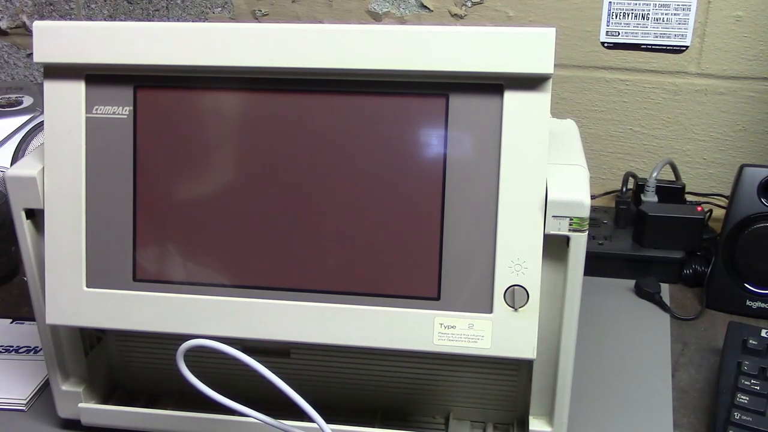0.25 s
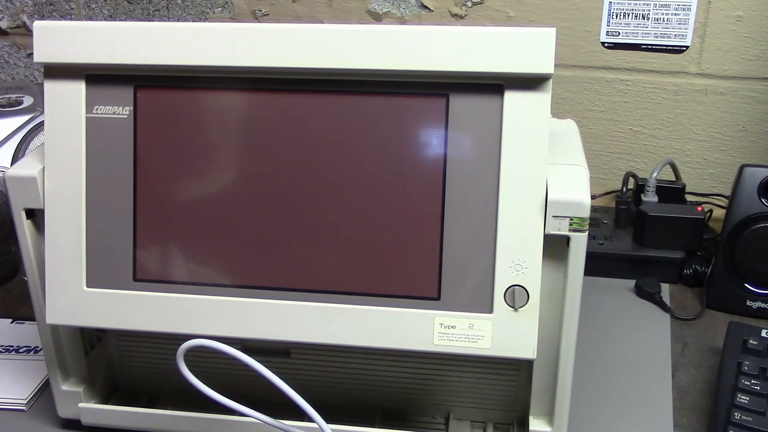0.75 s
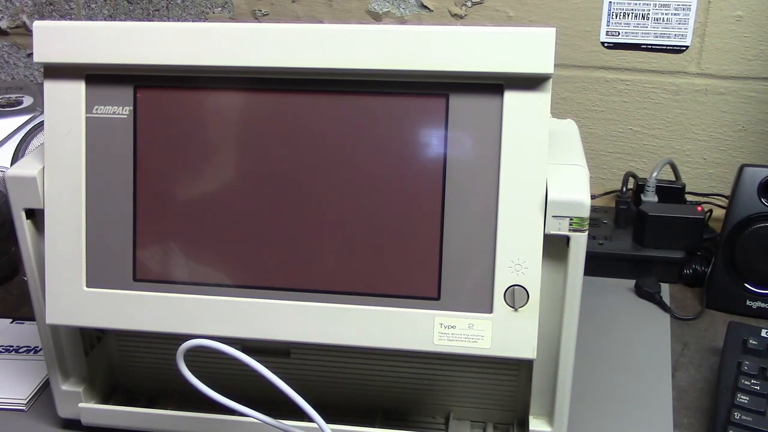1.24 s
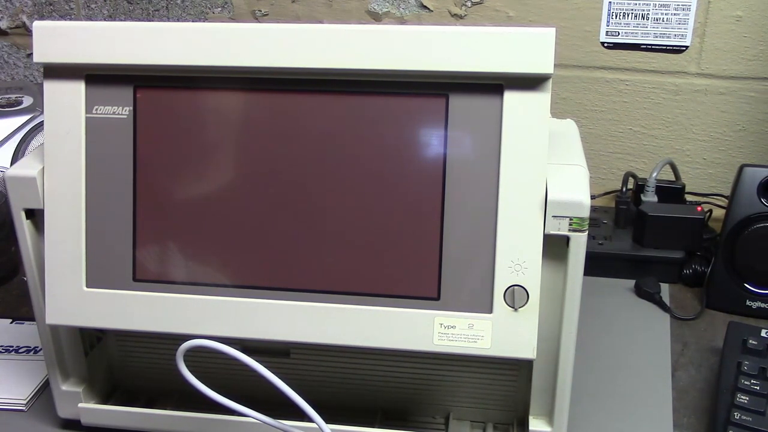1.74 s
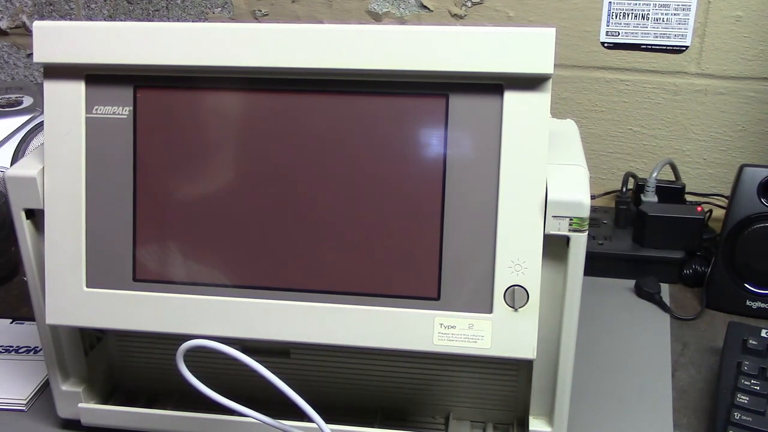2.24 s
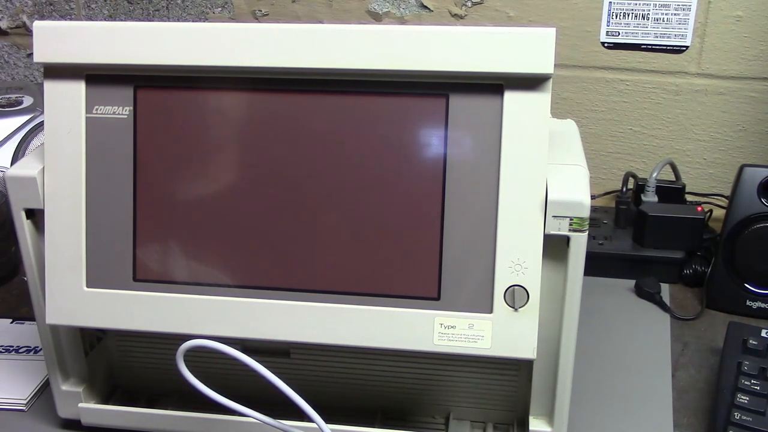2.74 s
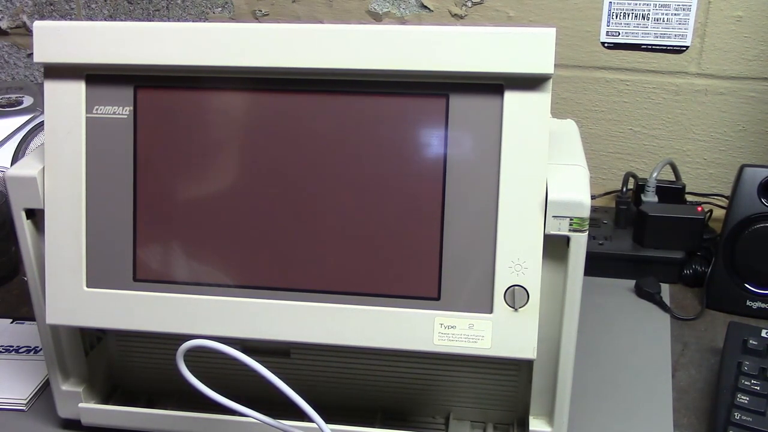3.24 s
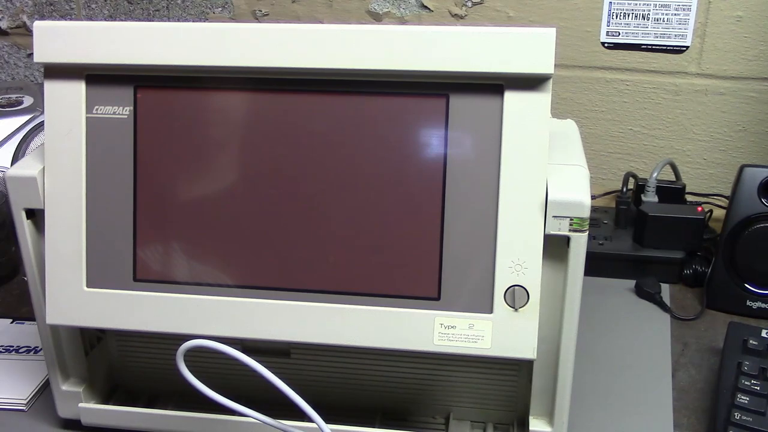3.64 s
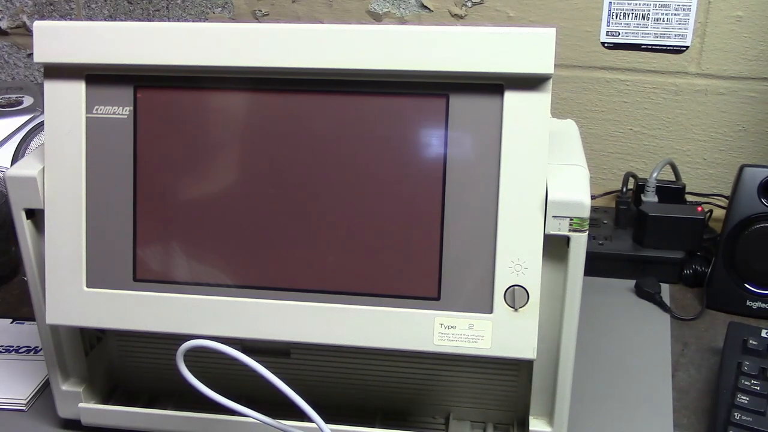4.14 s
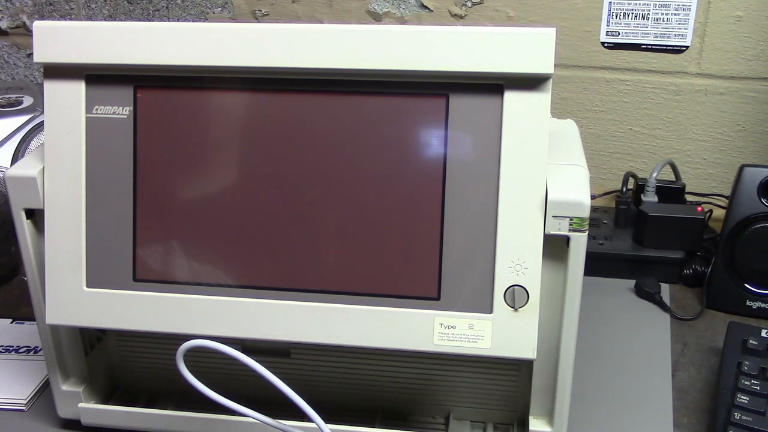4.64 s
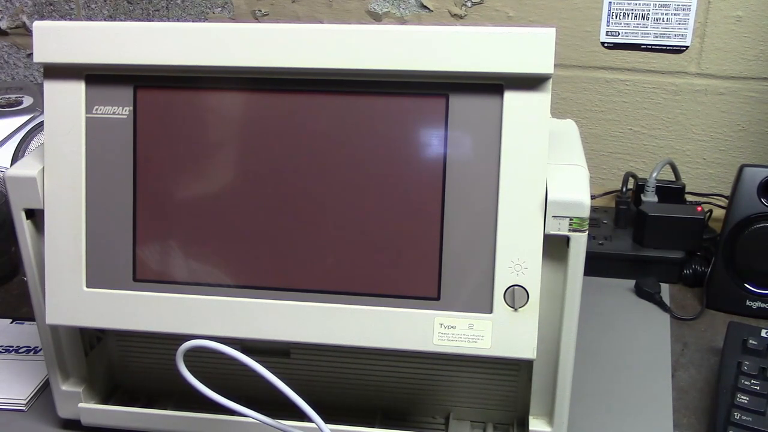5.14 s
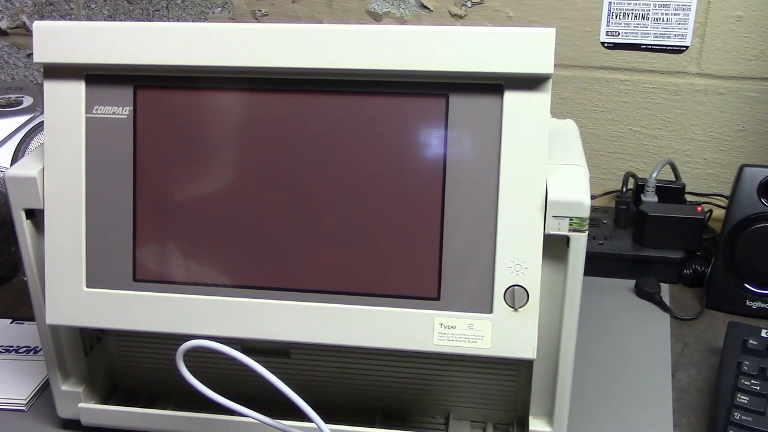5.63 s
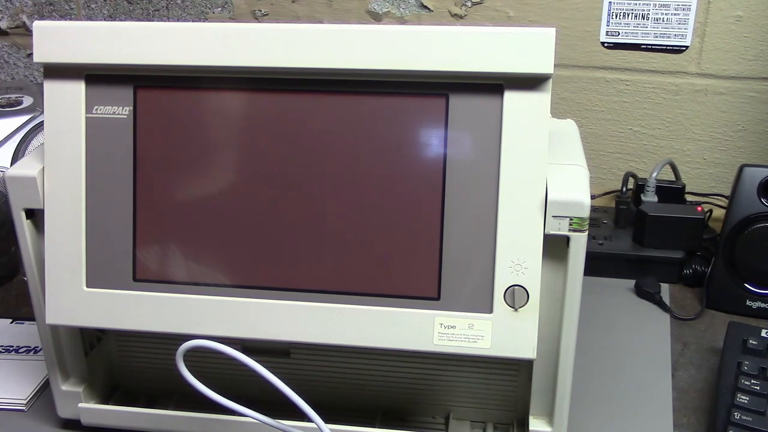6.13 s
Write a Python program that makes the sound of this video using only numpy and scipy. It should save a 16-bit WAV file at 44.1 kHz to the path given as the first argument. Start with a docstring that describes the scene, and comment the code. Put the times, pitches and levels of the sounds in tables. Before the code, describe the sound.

Close, nearly mono pickup of an old computer idling in a small hard-walled room. A deep mains hum and steady fan drone with soft airy noise run throughout. Sparse, muted head-motor buzzes come first, then stronger rattly ones just after three seconds, around five and near the end, with tiny gritty ticks. A very faint narrow pip returns every two seconds.

```python
"""Old portable computer idling

An old portable computer idles on a desk in a small block-walled room. Two fans and a disk spindle,
built from sines on multiples of their turning rates, run over mains hum and resonant air noise.
Now and then the drive's head motor buzzes with a rough frame rattle and its carriage ticks as gritty
noise bursts; a faint pip of narrow noise returns steadily. Near-mono, with peaks rounded."""
import sys
import numpy as np
from scipy import signal
from scipy.fft import rfft, irfft
from scipy.io import wavfile

SR = 44100
rng = np.random.default_rng(int(sys.argv[2]) if len(sys.argv) > 2 else 0)


def waveform_to_disk(signal):
    """Save audio, clipped to [-1, 1], as 16-bit WAV at the path in sys.argv[1]."""
    frames = np.transpose(np.atleast_2d(signal))
    scaled = np.clip(frames, -1, 1) * 32767
    samples = np.round(scaled).astype(np.int16)
    wavfile.write(sys.argv[1], SR, samples)


N = 281358
TIME_S = np.arange(N) / SR
HZ = np.maximum(np.fft.rfftfreq(N, 1 / SR), 1)   # kept above zero for logs and division


def from_db(db):
    """Turn decibels into amplitude gain."""
    return 10 ** (np.asarray(db) / 20)


def at_hz(points, hz):
    """Read a spectrum on a log-frequency axis, falling 12 dB per octave below its first point."""
    p = np.array(points)
    curve_db = np.interp(np.log(hz), np.log(p[:, 0]), p[:, 1])
    return curve_db + 40 * np.log10(np.minimum(hz / p[0, 0], 1))


def resonance(centre_hz, width_hz):
    """Bell-shaped curve that is 1 at its centre and half that at the edges of its width."""
    return 1 / (1 + ((HZ - centre_hz) / (width_hz / 2)) ** 2)


def resonance_lift_db(table):
    """Add up the decibel lifts of several resonances."""
    return sum(lift_db * resonance(hz, width_hz) for hz, width_hz, lift_db in table)


def coloured(density_db):
    """Shape white noise to the given power per Hz."""
    white = rfft(rng.standard_normal(N))
    return irfft(white * from_db(density_db) * np.sqrt(SR / 2), N)


def drift(rate_hz):
    """Random wander with spread 1, smoothed above the given rate."""
    slow = irfft(rfft(rng.standard_normal(N)) / (1 + (HZ / rate_hz) ** 2), N)
    return slow / slow.std()


def gate(start_s, length_s, tail_s, rise_s=0.0026):
    """Envelope that rises in a straight line, holds, then dies away exponentially."""
    since_start = TIME_S - start_s
    rise = np.clip(since_start / rise_s, 0, 1)
    return rise * np.exp(-np.maximum(since_start - length_s, 0) / tail_s)


def rotor(turn_hz, tones, waver_db):
    """Sines on multiples of one rate, from random phases, all wavering together in level."""
    turn = 2 * np.pi * turn_hz * TIME_S
    sines = sum(from_db(level_db) * np.sin(multiple * turn + rng.uniform(0, 2 * np.pi))
                for multiple, level_db in tones)
    return np.sqrt(2) * sines * from_db(waver_db * drift(6.1))   # root 2 makes the levels rms


# Tones of each fan, before wavering and dips: multiple [x turning rate], level_db [dB rms]
FAN_A_TONES = [(7, -36.8), (9, -51), (12, -44.8), (13, -55), (14, -58.5), (15, -56), (16, -56.5),
               (20, -51.3), (21, -57.7), (24, -40.4), (28, -52), (32, -53), (35, -64), (36, -57.3),
               (40, -56), (44, -66.3), (48, -68), (54, -71)]
FAN_B_TONES = [(6, -43), (12, -40.3), (18, -53.3), (21, -50), (22, -52.6), (23, -55), (24, -41.8),
               (30, -56)]
FAN_A_HZ, FAN_B_HZ = 44.458, 36.092   # turns per second


def fans():
    """Two fans turn at unrelated rates, each a stack of harmonics with its own waver."""
    return rotor(FAN_A_HZ, FAN_A_TONES, waver_db=0.86) + rotor(FAN_B_HZ, FAN_B_TONES, waver_db=0.52)


# Tones of the disk spindle, before wavering and dips: multiple [x turning rate], level_db [dB rms]
SPINDLE_TONES = [(1, -37), (84, -78), (104, -79), (106, -79), (110, -83), (157, -84), (158, -86)]
SPINDLE_HZ = 59.425   # turns per second


def spindle():
    """The disk hums at its turning rate, with a faint whine far up its harmonics."""
    return rotor(SPINDLE_HZ, SPINDLE_TONES, waver_db=0.92)


# Head motor runs: start_s [s], length_s [s], level_db [dB rms of the step tone, before wavering]
MOTOR_RUNS = [(.705, .03, -35), (1.395, .03, -37), (2.538, .025, -36), (3.152, .032, -24),
              (3.435, .035, -27.5), (3.695, .025, -38), (4.2, .025, -38), (4.7, .045, -34),
              (5.115, .03, -28), (5.158, .035, -30.5), (6.162, .045, -27.5), (6.26, .045, -28)]
# Tones of the buzz: multiple [x step rate], level_db [dB relative to the run]
STEP_TONES = [(1, 0), (2, -16.5)]
# Rattle of the drive frame: centre_hz [Hz], width_hz [Hz], level_db [dB, relative to each other]
FRAME_RATTLE = [(410, 60, -14), (650, 140, -3.5), (843, 46, 0), (1080, 110, -17), (1380, 150, -11)]
STEP_HZ, RATTLE_DB = 385, -7.5   # rattle is rms, relative to the run


def head_motor():
    """Each run is a short buzz at the step rate with a rough noise rattle of the frame."""
    running = sum(from_db(level_db) * gate(start_s, length_s, tail_s=.014)
                  for start_s, length_s, level_db in MOTOR_RUNS)
    buzz = rotor(STEP_HZ, STEP_TONES, waver_db=3.5)
    frame_gain = sum(from_db(level_db) * resonance(hz, width_hz)
                     for hz, width_hz, level_db in FRAME_RATTLE)
    rattle = coloured(20 * np.log10(frame_gain))
    return running * (buzz + from_db(RATTLE_DB) * rattle / rattle.std())


# Carriage ticks, short gritty rubs: start_s [s], length_s [s], level_db [dB rms, before raggedness]
TICKS = [(.325, .03, -56), (0.708, .014, -49), (2.538, .018, -51), (3.15, .014, -49), (3.177, .014, -52),
         (3.426, .01, -50), (3.7, .014, -51), (4.202, .018, -49), (4.54, 0.026, -43), (4.7, .009, -46),
         (5.114, .012, -50), (5.178, .012, -53), (6.154, .012, -52), (6.203, .019, -52), (6.25, .016, -50),
         (6.316, .012, -51)]
# Broad ringing of the carriage: centre_hz [Hz], width_hz [Hz], lift_db [dB]
CARRIAGE_RING = [(3750, 400, 6), (4850, 600, 7), (8300, 700, 4), (9700, 900, 4)]
TICK_LOW_HZ, TICK_PIVOT_HZ, TICK_TOP_HZ = 2600, 5000, 11000
TICK_TILT_DB = -5.5   # per octave, about the pivot


def carriage():
    """Each tick is a short burst of band-limited noise, lifted by ringing and ragged in level."""
    band_db = -10 * np.log10((1 + (TICK_LOW_HZ / HZ) ** 8) * (1 + (HZ / TICK_TOP_HZ) ** 8))
    tilt_db = TICK_TILT_DB * np.log2(HZ / TICK_PIVOT_HZ)
    grit = coloured(band_db + resonance_lift_db(CARRIAGE_RING) + tilt_db)
    rubbing = sum(from_db(level_db) * gate(start_s, length_s, tail_s=.011, rise_s=0.0066)
                  for start_s, length_s, level_db in TICKS)
    return rubbing * grit / grit.std() * from_db(2.2 * drift(200.0))


# Level of each return of the faint pip: level_db [dB rms]
PIP_LEVELS = [-46, -46, -48]
PIP_HZ, PIP_WIDTH_HZ = 1776, 57
PIP_FIRST_S, PIP_EVERY_S, PIP_LENGTH_S = .31, 2.0, .065


def pips():
    """Narrow noise around one pitch, switched on briefly at a steady interval."""
    tone = coloured(20 * np.log10(resonance(PIP_HZ, PIP_WIDTH_HZ)))
    switched_on = sum(
        from_db(level_db) * gate(PIP_FIRST_S + k * PIP_EVERY_S, PIP_LENGTH_S, tail_s=0.016, rise_s=0.013)
        for k, level_db in enumerate(PIP_LEVELS))
    return switched_on * tone / tone.std()


def mains_hum():
    """A steady sine of mains hum."""
    return np.sqrt(2) * from_db(-23.5) * np.sin(2 * np.pi * 120.05 * TIME_S)   # -23.5 dB rms before dips


# Air noise of the fans, before resonances and dips: frequency_hz [Hz], density_db [dB per Hz]
AIR_SPECTRUM = [(12, -58.5), (45, -46), (60, -54), (140, -57), (200, -49), (290, -56), (600, -65),
                (950, -63.5), (1120, -69.5), (1500, -73), (2400, -81.5), (4400, -89), (6900, -92.5),
                (15600, -102)]
# Room and case resonances in the air noise: centre_hz [Hz], width_hz [Hz], lift_db [dB]
ROOM_AND_CASE = [(27, 8, 3), (71, 9.2, 15), (97.4, 13.2, 14), (114.2, 9.4, 10.5), (166, 5.7, 6.5),
                 (188, 8.7, 2), (224.7, 10.4, 2.5), (242, 7.6, 2.5), (342, 11, 4.5), (400, 32, 2.5),
                 (471, 36, 4), (551, 54, 6.5), (671, 9.5, 6.5), (1346, 65, 2), (1483, 34, 4),
                 (1853, 64, 4.5), (2040, 36, 4.5), (5500, 550, 1.5), (5650, 260, 1)]
TREBLE_SPLIT_HZ = 2500


def air():
    """Turbulence is broad noise lifted at the resonances; its treble flickers slightly."""
    density_db = at_hz(AIR_SPECTRUM, HZ) + resonance_lift_db(ROOM_AND_CASE)
    low_db = -10 * np.log10(1 + (HZ / TREBLE_SPLIT_HZ) ** 4)
    high_db = -10 * np.log10(1 + (TREBLE_SPLIT_HZ / HZ) ** 4)
    treble = coloured(density_db + high_db) * from_db(.35 * drift(14.0))
    return coloured(density_db + low_db) + treble


# Faint noise of opposite polarity in left and right, strongest in the bass, before dips:
# frequency_hz [Hz], density_db [dB per Hz]
SIDE_NOISE = [(20, -77), (130, -104.5), (400, -101), (1000, -135), (2400, -115), (4300, -108), (9700, -108),
              (15500, -114)]


def side_noise():
    """One faint noise, strongest in the bass, sent with opposite polarity to left and right."""
    return coloured(at_hz(SIDE_NOISE, HZ)) * [[1], [-1]]


# Brief dips in the level of the steady sounds: start_s [s], depth_db [dB]
DIPS = [(0, 0), (2.2, -1.4), (3.6, -1.5), (4.95, -0.7)]


def level_dips():
    """Gain that falls briefly, holds and creeps back."""
    return from_db(sum(depth_db * gate(start_s, length_s=0.32, tail_s=0.15, rise_s=.1)
                       for start_s, depth_db in DIPS))


def scene():
    """The machine sits in the middle, faint noise to the sides; the dips touch only steady sounds."""
    level = level_dips()
    steady = fans() + spindle() + mains_hum() + air()
    middle = level * steady + head_motor() + carriage() + pips()
    return middle + level * side_noise()


CEILING, CUTOFF_HZ = .34, 15750   # ceiling is linear amplitude, ahead of the filter


def record(dry):
    """Round peaks against a ceiling, ease both ends, then cut the top with a steep low-pass."""
    rounded = dry / (1 + np.abs(dry / CEILING) ** 6) ** (1 / 6)
    samples_to_end = np.minimum(np.arange(N), np.arange(N)[::-1])
    fade = np.minimum(samples_to_end / (.002 * SR), 1)   # 2 ms at each end
    eased = rounded * np.sin(np.pi / 2 * fade) ** 2
    low_pass = signal.ellip(14, .5, 75, CUTOFF_HZ, fs=SR, output="sos")
    return signal.sosfilt(low_pass, eased)


dry = scene()
out = record(dry)
waveform_to_disk(out)
```